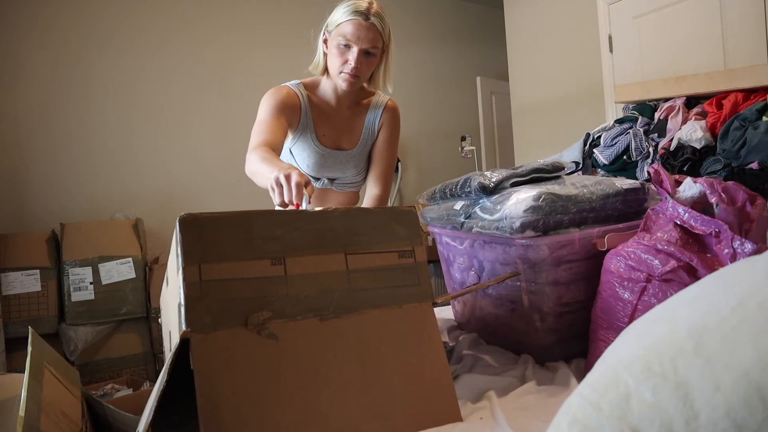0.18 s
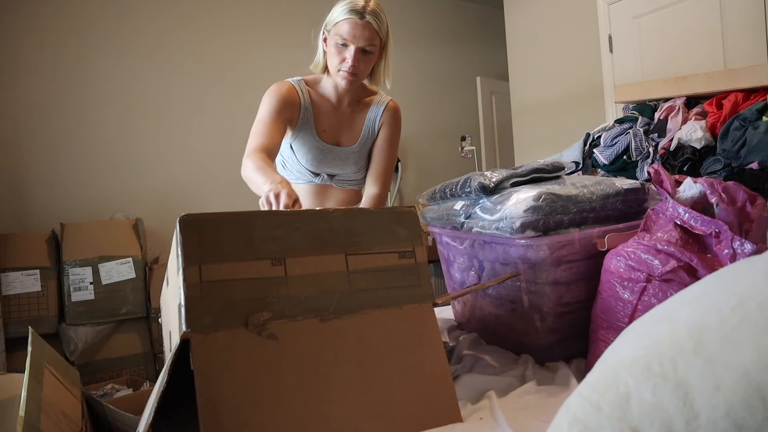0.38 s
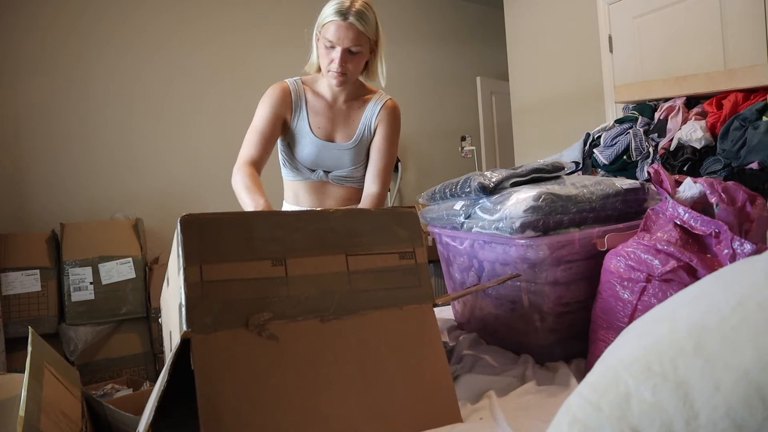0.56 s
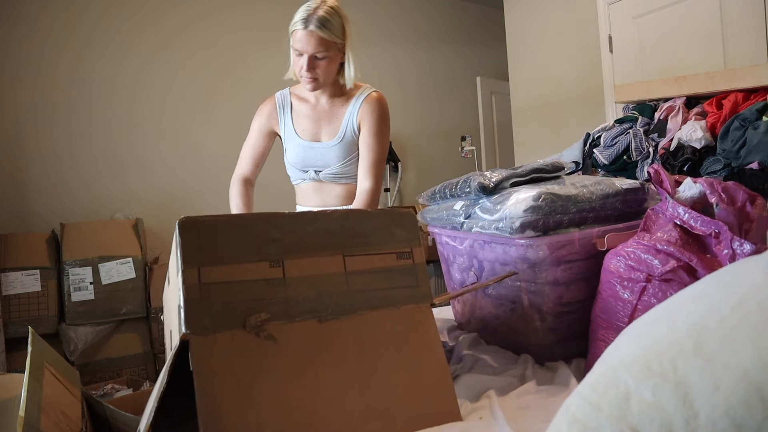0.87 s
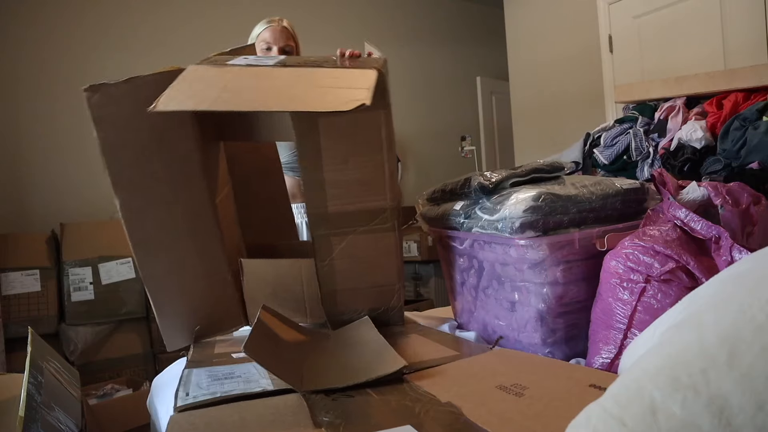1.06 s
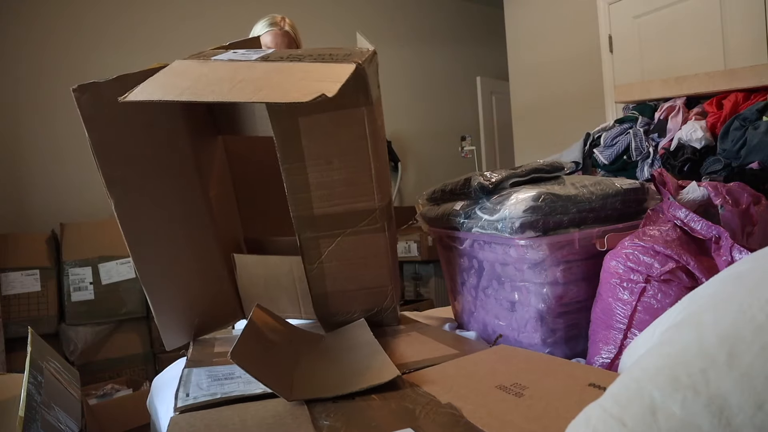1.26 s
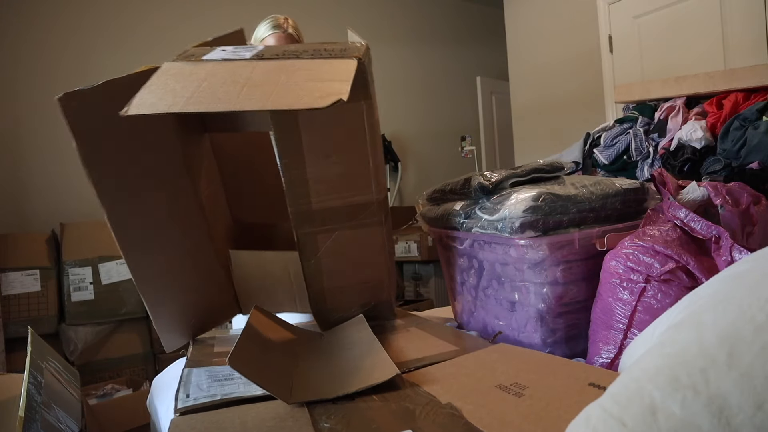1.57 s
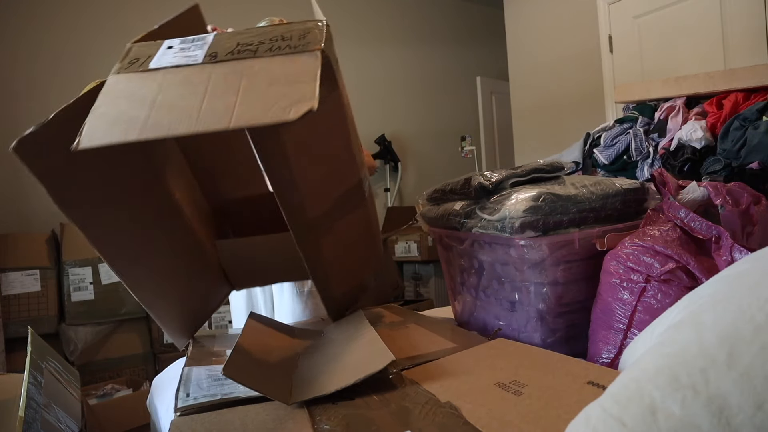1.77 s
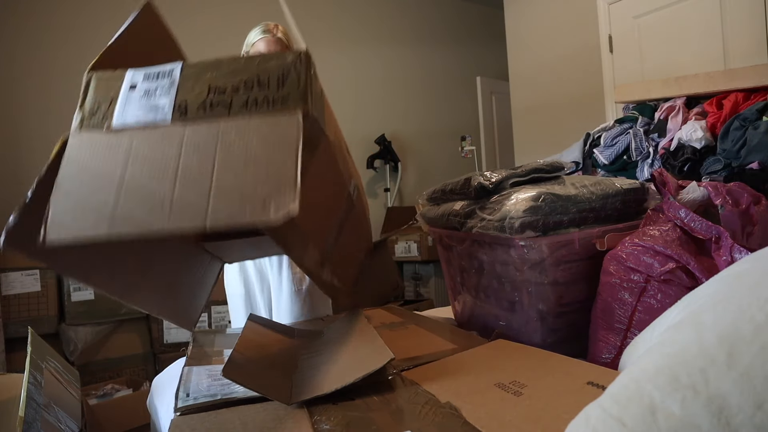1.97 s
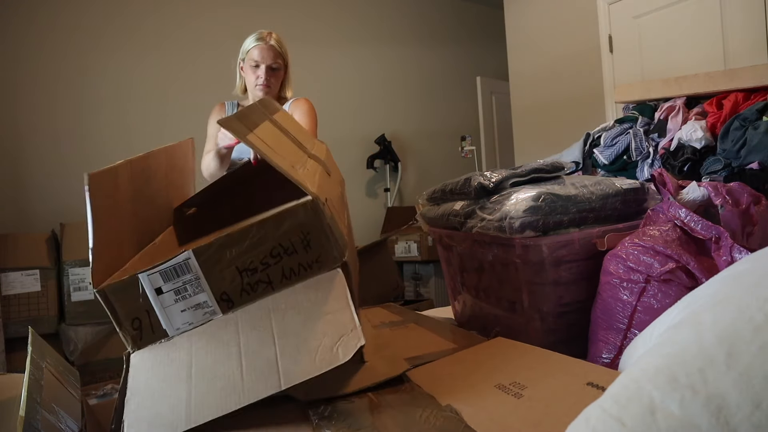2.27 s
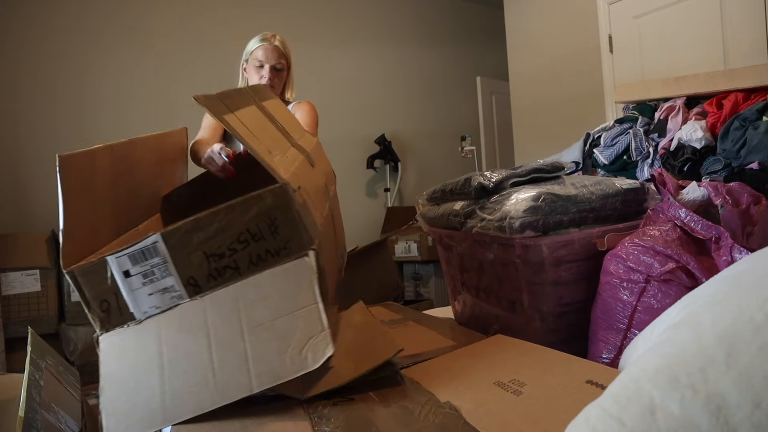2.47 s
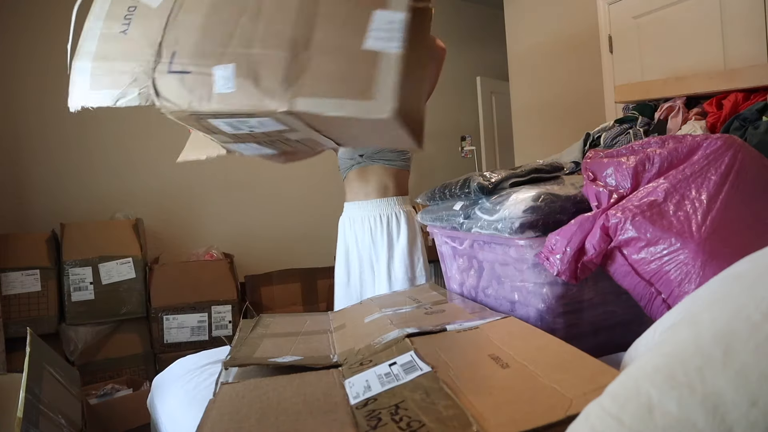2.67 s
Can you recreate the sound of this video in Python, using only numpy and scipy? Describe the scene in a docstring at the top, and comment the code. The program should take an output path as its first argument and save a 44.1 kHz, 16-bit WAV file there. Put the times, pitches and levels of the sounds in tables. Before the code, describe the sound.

A big empty cardboard box is tapped, slid and tipped with hollow thumps, brushed and turned with dry scraping, then knocked off a pile with a crunchy thud; close stereo microphone in a small furnished room.

```python
"""A large empty cardboard box is handled at close range in a small furnished room.
It is tapped and gripped, slid, tipped up, brushed, turned, then knocked off the pile and lifted.
Rubbing is stick-slip noise that hisses at the surface and excites the resonances of walls and hollow;
knocks are decaying panel modes with a noisy crunch; fingernails and tape give short bright ticks.
A plastic bag shifts at the end, modelled as one more stroke; a diffuse tail and room tone surround all."""
import sys
import numpy as np
from scipy import signal
from scipy.fft import rfft, irfft
from scipy.io import wavfile
from scipy.ndimage import uniform_filter1d, map_coordinates

SR = 44100
rng = np.random.default_rng(int(sys.argv[2]) if len(sys.argv) > 2 else 0)


def waveform_to_disk(signal):
    """Save audio, clipped to [-1, 1], as 16-bit WAV at the path in sys.argv[1]."""
    frames = np.transpose(np.atleast_2d(signal))
    scaled = np.clip(frames, -1, 1) * 32767
    samples = np.round(scaled).astype(np.int16)
    wavfile.write(sys.argv[1], SR, samples)


N = 123480
T = np.arange(N) / SR
HZ = np.fft.rfftfreq(N, 1 / SR)

# Level contours of each stroke, before the common trims:
# [t/s, surface hiss level/dB, wall ring level/dB, hollow boom level/dB]
SLIDE = [(0.245, -48, -45, -30), (0.255, -32.5, -32.5, -34), (0.417, -31, -22.5, -26.5),
         (0.521, -30, -31.5, -31), (0.657, -48.5, -38, -24.5), (0.71, -40, -49, -33)]
TIP = [(0.71, -38, -24.5, -32), (0.764, -29.5, -19, -26), (0.818, -29, -20.5, -24.5),
       (0.922, -28, -19, -22.5), (0.994, -29, -19, -23), (1.005, -31, -11.5, -26)]
BRUSH = [(1.005, -37, -38, -50), (1.035, -40.5, -31, -60), (1.125, -35.5, -39.5, -41.5),
         (1.217, -37, -33, -38.5), (1.267, -40, -36.5, -56), (1.46, -48, -34.5, -41)]
TURN = [(1.46, -47, -29.5, -33), (1.59, -40.5, -26.5, -35), (1.69, -31, -22.5, -36),
        (1.818, -31.5, -21, -29), (1.986, -41, -29, -39.5), (2.018, -39, -20, -36), (2.1, -53, -39.5, -48),
        (2.185, -55, -37, -46)]
TOSS = [(2.21, -29, -22, -18), (2.232, -28.5, -31, -29), (2.246, -25.5, -25.5, -25),
        (2.354, -39, -28.5, -37.5), (2.526, -36, -29.5, -37), (2.58, -53, -45, -49)]
BAG = [(2.58, -45.5, -36, -49), (2.726, -37, -41, -44.5), (2.8, -40, -45, -47)]
# Strokes: [contour, flexing f/Hz, hollow level/dB relative to flexing, favoured wall f/Hz,
# hiss peak f/Hz, hiss tilt/(dB per octave), grain spread/dB]
STROKES = [(SLIDE, 125, 1, 640, 4360, 0, 2.1), (TIP, 106.6, -4.5, 450, 1950, 0.66, 1.8),
           (BRUSH, 125, -9, 490, 1570, -0.089, 1.5), (TURN, 136, -11, 425, 1900, 0, 1.3),
           (TOSS, 70, -7, 590, 1730, -1.5, 1.6), (BAG, 44, -3.5, 390, 5100, 1.75, 1.3)]
# Scuffs of a flap: [t/s, length/s, wall f/Hz, wall level/dB, hiss level/dB]
SCUFFS = [(0.533, 0.21, 360, -31, -50), (0.933, 0.064, 557, -22, -26.5), (1.329, 0.065, 760, -35, -41),
          (1.528, 0.035, 1000, -25, -29.5), (1.725, 0.066, 870, -26.5, -51), (1.99, 0.056, 556, -30, -53),
          (2.116, 0.038, 750, -37.5, -47)]
# Knocks: [t/s, thump level/dB, thump f/Hz, thump t60/s, wall level/dB, crack level/dB]
KNOCKS = [(0.034, -38, 181, 0.067, -35.5, -31), (0.238, -33, 167, 0.089, -18.5, -22),
          (0.751, -10, 100.3, 0.15, -28, -33), (0.879, -2, 104, 0.059, -34, -11),
          (0.914, -2, 118.5, 0.1, -25, -35), (1.464, -16.5, 151, 0.12, -35, -48),
          (1.530, -12, 428, 0.056, -19, -20), (1.633, -17, 125, 0.087, -29, -34),
          (1.778, -15, 119, 0.065, -30, -21), (1.946, -12.5, 114, 0.04, -40, -20),
          (2.200, -5, 606, 0.021, -20, -16), (2.208, -9, 66, 0.06, -29, -18),
          (2.240, -6.5, 65, 0.084, -21, -8), (2.248, -13, 540, 0.034, -15.5, -6.5),
          (2.279, -14, 125, 0.063, -14.5, -16.5)]
# Ticks of fingernails and tape: [t/s, peak level/dB]
TICKS = [(0.1254, -30.5), (0.1742, -27), (0.197, -38), (0.228, -27), (0.234, -13.5), (0.2386, -7)]
# Resonances of the box walls: [f/Hz, width/Hz, relative level/dB]
WALL_MODES = [(310.5, 12.3, -8.5), (379, 39, -0.5), (459.4, 9.9, 2), (523.5, 24, 3), (595, 33.5, 0.5),
              (683, 44, -3), (892, 146, -4.5), (1176, 120, -8), (1420, 150, -10.5)]
# Relative spectrum of rubbing card: [f/Hz, level/dB]
HISS_SPECTRUM = [(30, 17), (250, 3.5), (600, 3), (1200, 4), (1900, 4), (3000, 0), (4200, -1.5),
                 (6000, -3.5), (8000, -5), (11000, -4), (12200, -6.5), (13300, -27.5), (15000, -98)]
# Relative spectrum of a tick: [f/Hz, level/dB]
TICK_SPECTRUM = [(100, -3), (1200, -14), (2400, -0.5), (4000, 3), (7000, -6), (12000, -3), (15000, -40)]
# Relative spectrum of the room tone: [f/Hz, level/dB]
ROOM_TONE_SPECTRUM = [(20, -8), (80, -0.5), (250, -15.5), (900, -19.5), (3000, -29), (15000, -48)]
# Decay of the room: [f/Hz, t60/s]
ROOM_DECAY = [(100, 0.17), (600, 0.18), (3000, 0.75), (12000, 0.12)]
# Stereo width: [f/Hz, gain of the side signal/dB]
SIDE_GAIN = [(90, -75), (200, -14.5), (400, -15.5), (650, -7.5), (1100, -2.5), (2200, 1), (4200, 4.5),
             (8000, 4.5), (12500, 8.5)]

# Rubbing: trims of the three paths, then grain density, chatter depth (rms) and chatter time constant
HISS_TRIM_DB, WALL_TRIM_DB, BOOM_TRIM_DB = 0, -6, -0.5
SLIPS_PER_S, CHATTER_DB, CHATTER_S = 7000, 0.97, 0.036
HISS_PEAK_DB, WALL_FOCUS_DB = 0, 7
# Resonances of the box as a whole; the flexing width is a share of its frequency
HOLLOW_HZ, HOLLOW_WIDTH_HZ, FLEX_WIDTH_SHARE = 167.4, 17.2, 0.2
SWAY_HZ, SWAY_DB = 50.6, -12.5
# Wander of the resonances (rms share of frequency) and levelling of slow beats (0 none, 1 full)
BEND_SHARE, HISS_WANDER_SHARE, BEND_SAMPLES = 0.025, 0.12, 2600
LEVELLING, LEVELLING_SAMPLES = 0.9, 1300
SHIFT_DB, SHIFT_ABOVE_HZ = 3.5, 910
# Knocks and ticks
SECOND_MODE_RATIO, SECOND_MODE_DB, THUMP_RISE_CYCLES = 0.642, -10.5, 0.6
CRACK_T60_S, TICK_T60_S = 0.025, 0.018
# Room, stereo image and output
ROOM_TONE_DB, HIT_ROOM_DB, RUB_ROOM_DB = -48.5, -4.5, -13
ROOM_ABOVE_HZ, LOW_CUT_HZ = 220, 33
LEFT_LEAD, BALANCE_DB = 0.11, 1.5
CEILING, EDGE_HZ = 0.85, 15100


def amp(db):
    """Amplitude ratio: twenty decibels are a factor of ten."""
    return 10 ** (np.asarray(db) / 20)


def unit(x):
    """Normalisation to unit root-mean-square value."""
    return x / np.sqrt(np.mean(x ** 2) + 1e-20)


def read(points, hz):
    """Linear interpolation of a table along a logarithmic frequency axis."""
    f, value = np.transpose(points)
    return np.interp(np.log(hz + 1), np.log(f + 1), value)


def colour(x, response):
    """Linear filtering: the spectrum is multiplied by a frequency response."""
    return irfft(rfft(x, N) * response, N)


def in_band(x, lo, hi):
    """Normalisation to unit rms value within one frequency band."""
    return x / np.std(colour(x, (HZ > lo) & (HZ < hi)))


def above(hz):
    """Zero-phase fourth-order low cut."""
    return HZ ** 4 / np.hypot(HZ ** 4, hz ** 4)


def resonance(hz, width_hz):
    """Damped harmonic resonator: unit gain at its natural frequency."""
    return 1j * HZ * width_hz / (hz ** 2 - HZ ** 2 + 1j * HZ * width_hz)


def dying(t60):
    """Exponential damping: the amplitude falls by 60 dB in t60 seconds."""
    return np.exp(-np.log(1000) * T / t60)


def add(mix, s, sound):
    """Superposition of a sound onto the mix from time s."""
    part = mix[max(round(s * SR), 0):]
    part += sound[:len(part)]


def room_tone():
    """Stationary background: Gaussian noise with a falling spectrum above the low bass."""
    noise = rng.standard_normal(N)
    return amp(ROOM_TONE_DB) * unit(colour(noise, amp(read(ROOM_TONE_SPECTRUM, HZ))))


def walls():
    """Modal superposition: the wall resonances add with alternating sign."""
    response = 0
    for k, (hz, width_hz, db) in enumerate(WALL_MODES):
        response = response + (-1) ** k * amp(db) * resonance(hz, width_hz)
    return response


def knock(thump_db, thump_hz, t60, wall_db, crack_db):
    """Impulsive excitation: a panel swings in two damped modes, the walls ring and the edge crunches."""
    phase = 2 * np.pi * thump_hz * T
    swing = np.sin(phase) + amp(SECOND_MODE_DB) * np.sin(SECOND_MODE_RATIO * phase)
    rise = 1 - np.exp(-T * thump_hz / THUMP_RISE_CYCLES)
    thump = swing * dying(t60) * rise

    crunch = rng.standard_normal(N) * dying(CRACK_T60_S)
    wall = colour(crunch, walls())
    crack = colour(crunch, amp(read(HISS_SPECTRUM, HZ)))

    sound = amp(thump_db) * thump
    sound = sound + amp(wall_db) * wall / abs(wall).max()
    sound = sound + amp(crack_db) * crack / abs(crack).max()
    return sound * (T < 0.5)


def room(x):
    """Diffuse reverberation: sparse random echoes, lasting longest near 3 kHz, with little bass."""
    echoes = rng.standard_normal(SR) * (rng.random(SR) < 3000 / SR)
    echoes = echoes * (T[:SR] > 0.004)
    hz, t, z = signal.stft(echoes, SR, nperseg=256)
    decay = amp(-60 * t / read(ROOM_DECAY, hz)[:, None])
    tail = signal.istft(z * decay, SR, nperseg=256)[1]
    return signal.fftconvolve(colour(x, above(ROOM_ABOVE_HZ)), tail / np.linalg.norm(tail))[:N]


def tick(db):
    """Short transient: rapidly damped noise with a bright spectrum."""
    burst = rng.standard_normal(N) * dying(TICK_T60_S)
    snap = colour(burst, amp(read(TICK_SPECTRUM, HZ))) * (T < 0.5)
    return amp(db) * snap / abs(snap).max()


def slips(spread_db):
    """Stick-slip friction: random snaps of uneven size, whose strength follows the chatter of the card."""
    size = amp(spread_db * np.minimum(rng.exponential(1, N), 6)) * rng.choice([-1, 1], N)
    pole = np.exp(-1 / (CHATTER_S * SR))
    chatter = unit(signal.lfilter([1], [1, -pole], rng.standard_normal(N)))
    occurs = rng.random(N) < SLIPS_PER_S / SR
    return size * occurs * amp(CHATTER_DB * chatter)


def levelled(x):
    """Power levelling: slow random beats of the noise are evened, so that the level follows the contour."""
    power = uniform_filter1d(x ** 2, size=LEVELLING_SAMPLES, mode="wrap")
    return x / (abs(power) + 1e-20) ** (LEVELLING / 2)


def bending(x, share=BEND_SHARE):
    """Frequency modulation by a varying time scale: resonances wander as the card bends in the hands."""
    wander = unit(uniform_filter1d(rng.standard_normal(N), size=BEND_SAMPLES, mode="wrap"))
    return map_coordinates(x, [np.cumsum(1 + share * wander)], order=3, mode="wrap")


def wall_ring(drive, focus_hz, focus_db):
    """Forced modal vibration: the bending walls ring, most strongly near one frequency."""
    focus = amp(focus_db * abs(resonance(focus_hz, focus_hz / 4)))
    ring = colour(drive, walls() * focus)
    return in_band(bending(levelled(ring)), 350, 1500)


def surface_hiss(drive, peak_hz, tilt_db):
    """Surface radiation: a tilted friction spectrum with one broad wandering peak."""
    tilt = tilt_db * np.log2(np.maximum(HZ, 1000) / peak_hz)
    hiss = colour(drive, amp(read(HISS_SPECTRUM, HZ) + tilt))
    peak = colour(hiss, resonance(peak_hz, peak_hz / 4) ** 2)
    hiss = hiss + amp(HISS_PEAK_DB) * bending(peak, HISS_WANDER_SHARE)
    return in_band(hiss, 2500, 12000)


def hollow_boom(drive, flex_hz, hollow_db):
    """Low resonances: flexing, the hollow and a slow sway respond together beneath a treble roll-off."""
    box = resonance(flex_hz, FLEX_WIDTH_SHARE * flex_hz)
    box = box + amp(hollow_db) * resonance(HOLLOW_HZ, HOLLOW_WIDTH_HZ)
    box = box + amp(SWAY_DB) * resonance(SWAY_HZ, SWAY_HZ)
    boom = colour(drive, box / np.sqrt(1 + (HZ / 215) ** 6))
    return in_band(bending(levelled(boom)), 50, 250)


def rub(levels, flex_hz, hollow_db, focus_hz, peak_hz, tilt_db, spread_db):
    """Common excitation: the slips of one stroke drive the surface, the walls and the hollow box."""
    s, *dbs = np.transpose(levels)
    hiss_gain, wall_gain, boom_gain = (amp(np.interp(T, s, db)) for db in dbs)
    # power ramps over 10 ms, centred on each end of the stroke
    contact = np.sqrt(np.clip(np.minimum(T - s[0], s[-1] - T) / 0.01 + 0.5, 0, 1))
    drive = slips(spread_db)
    sound = amp(HISS_TRIM_DB) * hiss_gain * surface_hiss(drive, peak_hz, tilt_db)
    sound = sound + amp(WALL_TRIM_DB) * wall_gain * wall_ring(drive, focus_hz, WALL_FOCUS_DB)
    sound = sound + amp(BOOM_TRIM_DB) * boom_gain * hollow_boom(drive, flex_hz, hollow_db)
    return contact * sound


def scuff(start, length, hz, wall_db, hiss_db):
    """Selective resonance: a flap catches briefly and groans near one frequency of the walls."""
    drive = slips(spread_db=1.5)
    arch = np.sqrt(abs(np.sin(np.pi * np.clip((T - start) / length, 0, 1))))
    groan = wall_ring(drive, hz, focus_db=14.0)
    hiss = unit(colour(drive, amp(read(HISS_SPECTRUM, HZ))))
    return arch * (amp(wall_db) * groan + amp(hiss_db) * hiss)


def shifting(x):
    """Spectral modulation: above the bass, patches swell and sink as the point of contact moves."""
    hz, _, z = signal.stft(x, SR, nperseg=1024, noverlap=768)
    patches = uniform_filter1d(rng.standard_normal(z.shape), size=7, axis=0)
    patches = uniform_filter1d(patches, size=11, axis=1)
    depth_db = SHIFT_DB * (hz ** 2 / (hz ** 2 + SHIFT_ABOVE_HZ ** 2))[:, None]
    return signal.istft(z * amp(depth_db * unit(patches)), nperseg=1024, noverlap=768)[1][:N]


def handling():
    """Superposition of direct sound, reverberation and room tone, with fresh random grains at each call."""
    hits = np.zeros(N)
    for s, *blow in KNOCKS:
        add(hits, s, knock(*blow))
    for s, db in TICKS:
        add(hits, s, tick(db))
    strokes = sum(rub(*row) for row in STROKES)
    scuffs = sum(scuff(*row) for row in SCUFFS)
    rubbing = shifting(strokes + scuffs)
    direct = colour(rubbing + hits, above(LOW_CUT_HZ))
    reverberant = room(amp(HIT_ROOM_DB) * hits + amp(RUB_ROOM_DB) * rubbing)
    return direct + reverberant + room_tone()


def scene():
    """Mid-side stereophony: shared bass, wide treble, and the box a little to the left."""
    mid = handling()
    # a share of mid in quadrature gives a phase difference between the channels
    lead = colour(mid, 1j * LEFT_LEAD)
    side = colour(handling() + lead, amp(read(SIDE_GAIN, HZ)))
    # the level difference grows above about 400 Hz
    lean = amp(BALANCE_DB / 2 * HZ / (HZ + 400))
    return np.array([colour(mid + side, lean), colour(mid - side, 1 / lean)])


def record(dry):
    """Smooth saturation rounds off the highest peaks; a linear-phase low-pass then limits the band."""
    held = dry / (1 + (dry / CEILING) ** 4) ** 0.25
    low_pass = signal.firwin(511, EDGE_HZ, window=("kaiser", 9), fs=SR)
    return signal.oaconvolve(held, low_pass[None], "same")


dry = scene()
out = record(dry)
waveform_to_disk(out)
```